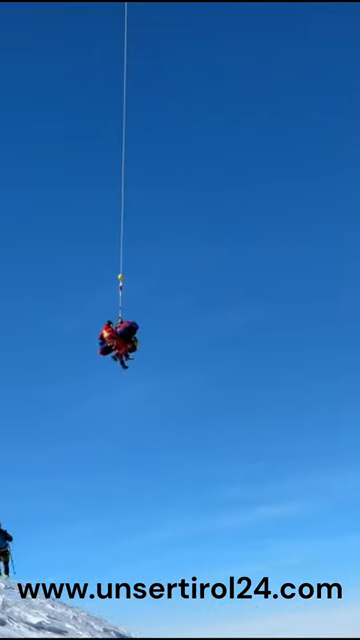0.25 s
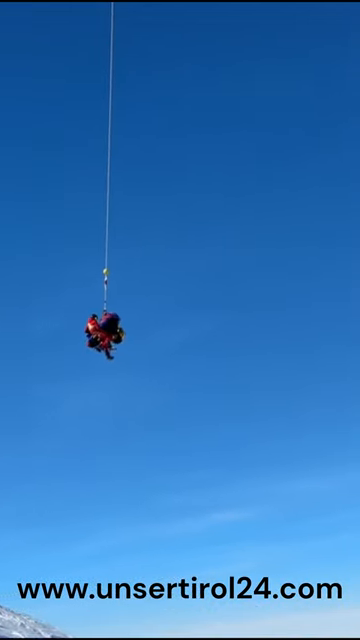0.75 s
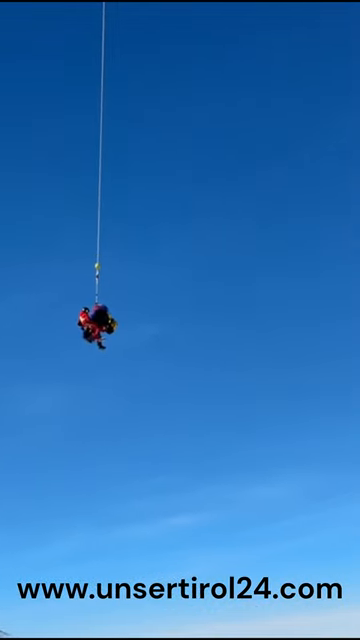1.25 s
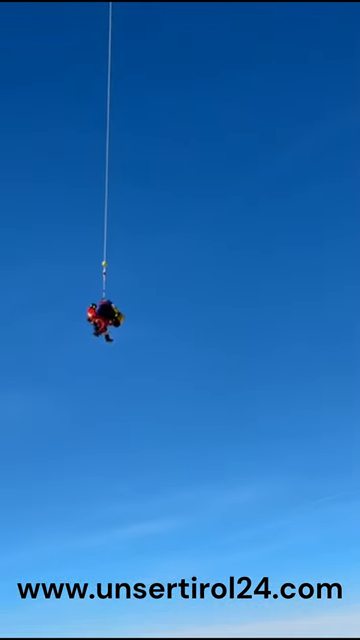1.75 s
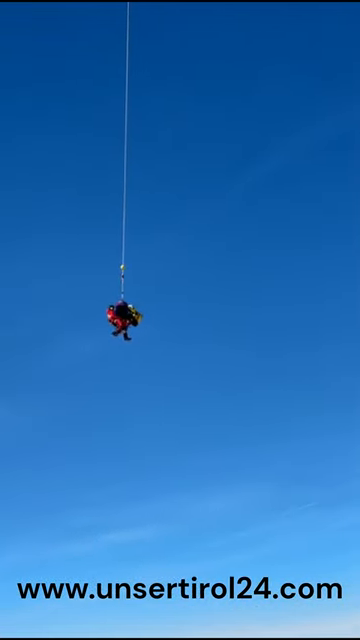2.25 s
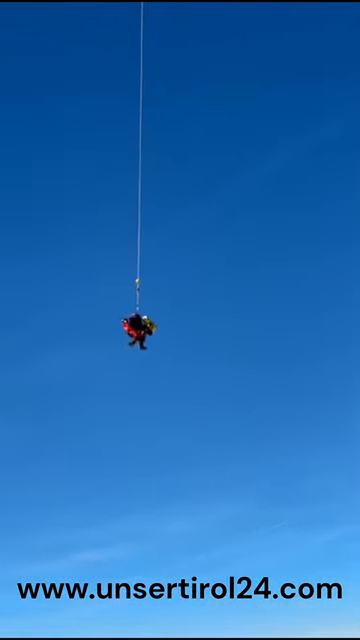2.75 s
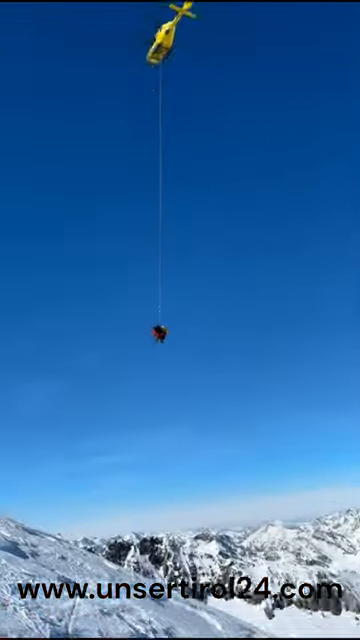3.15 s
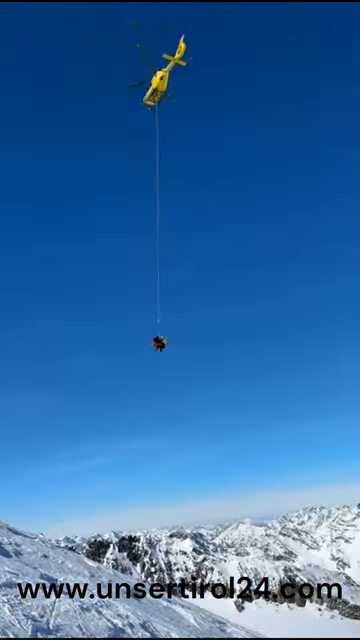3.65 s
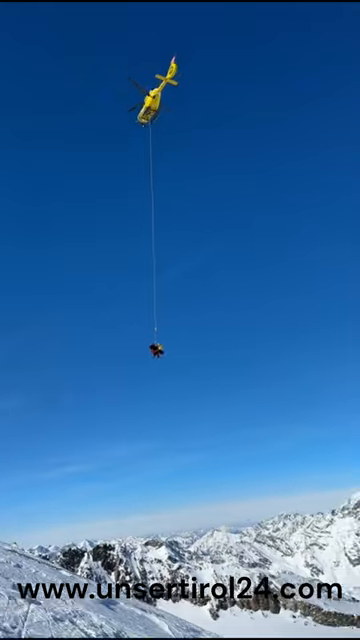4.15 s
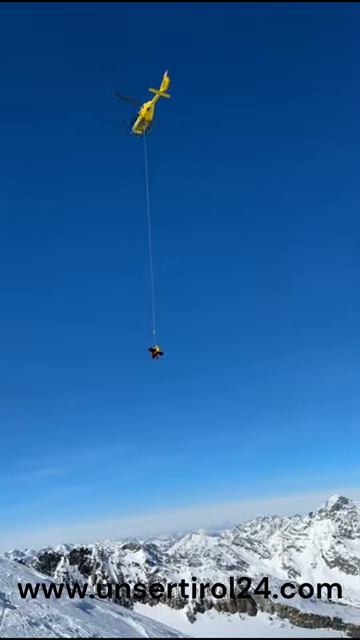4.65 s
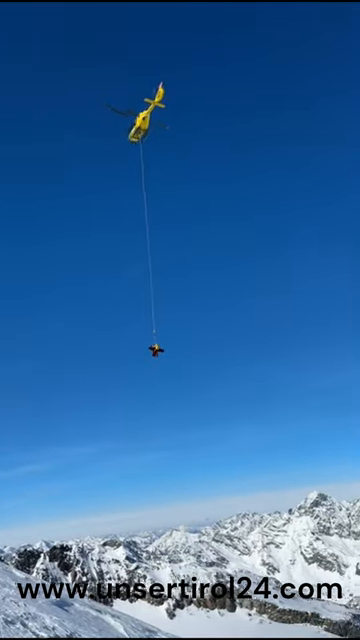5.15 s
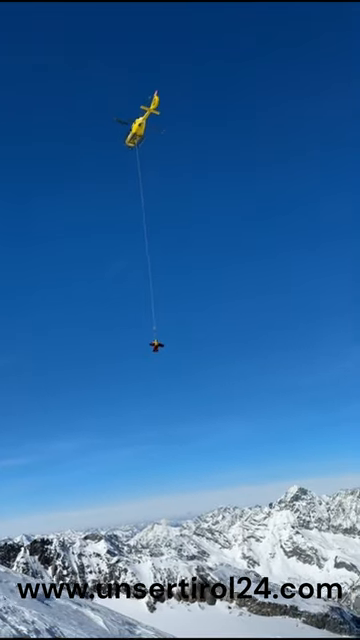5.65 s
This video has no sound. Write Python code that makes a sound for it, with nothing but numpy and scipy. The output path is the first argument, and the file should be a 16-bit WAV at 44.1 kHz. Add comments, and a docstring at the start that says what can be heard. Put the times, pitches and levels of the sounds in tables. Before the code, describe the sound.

A rescue helicopter hovers close with a singing tail rotor and throbbing blades, slaps hard as it turns, then fades into the distance over windy snow.

```python
"""First a ducted tail rotor singing near 497 Hz, under turbine hiss, with gusts bumping the microphone.
High over a snowy summit a rescue helicopter hovers, then turns and draws away into the distance.
The tail rotor is a stack of shaken tones; the main blades throb, swish and for a moment slap through
their own wake, made of harmonics, noise pulsed at the blade rate and short filtered cracks.
Wind is coloured noise swelling in gusts; a thin whine and a deep hum edge the scene."""
import sys
import numpy as np
from scipy import signal
from scipy.fft import rfft, irfft
from scipy.io import wavfile

SR = 44100
rng = np.random.default_rng(int(sys.argv[2]) if len(sys.argv) > 2 else 0)


def wav_out(sig):
    """Save sig, one row per channel (or a flat mono array), as 16-bit PCM at SR to the path in sys.argv[1]."""
    wavfile.write(sys.argv[1], SR, np.round(np.clip(np.atleast_2d(sig).T, -1, 1) * 32767).astype(np.int16))


N = 260181
TIME = np.arange(N) / SR  # s
BINS = np.fft.rfftfreq(N, 1 / SR)  # Hz

# Table levels are starting points: the functions add their trims. Colours give only the spectral shape.
# single buffets at the microphone: [t/s, level/dB, length/s, upper edge f/Hz (at least 100 is used)]
BUFFETS = [(.085, -18, 0.063, 446), (0.171, -27, 0.12, 358), (.243, -28, .06, 308), (2.74, -36, 0.056, 251),
           (2.809, -23.5, 0.046, 116), (2.903, -32, 0.078, 377), (2.96, -24.5, 0.036, 113),
           (3.044, -35, .04, 447), (3.128, -29.5, .09, 260), (3.2, -34.5, .05, 350),
           (3.264, -28.5, .06, 420), (3.421, -36, 0.23, 470), (3.673, -38, 0.11, 250),
           (3.78, -45, .06, 203), (5.57, -32, 0.068, 200)]
# gusts over the breeze: [t/s, level/dB, length/s, share that differs between left and right/0-1]
GUSTS = [(0.016, -32, 0.31, .05), (1.66, -25, 0.099, 0), (2.37, -37.5, 1, .05), (2.814, -28, .46, 0),
         (3.137, -36.5, 0.4, 0.07), (3.365, -39, 0.39, 0.18), (4.467, -39, 0.26, 0.6),
         (4.69, -49, 0.46, 0.8), (4.96, -40, 0.2, 1), (5.15, -42.5, 0.3, 0.13), (5.68, -52, .44, .35)]
BREEZE_DB = -50
# colour of the wind common to both channels: [f/Hz, level/dB per Hz]
WIND_COLOUR = [(15, -38), (30, -16), (52, -4), (75, 3.5), (115, 1.5), (200, -6.5), (400, -16), (1000, -45)]
# colour of the wind opposed between the channels: [f/Hz, level/dB per Hz]
CROSSWIND_COLOUR = [(50, -12.5), (110, -3), (180, 2), (280, -6), (500, -22)]

# the thin whine at the very top: [t/s, level/dB, centre f/Hz]
WHINE = [(0, -39.5, 9260), (1.5, -38.5, 9420), (2.4, -40, 9250), (2.85, -42.5, 9270), (3.3, -42, 9300),
         (3.9, -39, 9280), (5, -38.5, 9230), (5.9, -36.5, 9150)]
# its skirt: [distance from the centre f/Hz, level/dB]
WHINE_SKIRT = [(0, 9.5), (80, 1.5), (200, -1.5), (400, -23.5), (900, -38.5), (1500, -33.5)]
# the deep hum of the main rotor, which carries farthest: [t/s, level/dB]
HUM = [(0, -49), (3.8, -53), (4.8, -49.5), (5.3, -51), (5.9, -47)]

# the blades' rush and the turbines' hiss: [t/s, rush level/dB, hiss level/dB]
AIR = [(0, -32.5, -29), (.38, -37.5, -31.5), (.62, -29.5, -31.5), (.82, -36, -34.5), (1.12, -33, -33.5),
       (1.25, -27.5, -26.5), (1.89, -25, -28.5), (2.12, -31, -36.5), (2.32, -28, -34), (2.5, -31, -33),
       (2.95, -45.5, -38.5), (3.4, -48.5, -43.5), (3.58, -43, -40.5), (3.85, -45, -40), (4.18, -42.5, -37),
       (4.42, -33, -37), (4.56, -34, -38.5), (4.76, -45.5, -39.5), (5.1, -45, -40.5), (5.56, -37.5, -38.5),
       (5.9, -43, -40)]
# colour of the rush: [f/Hz, level/dB per Hz]
RUSH_COLOUR = [(200, -21), (400, -4), (560, 1.5), (800, 3.5), (1000, 0.5), (1250, -5.5), (1800, -30.5)]
# colour of the swish: [f/Hz, level/dB per Hz]
SWISH_COLOUR = [(800, -31), (1200, -1), (1550, 4.5), (1780, -2), (2050, 2), (2650, 1), (3100, -6),
                (3700, -5.5), (4500, -15), (5500, -23)]
# exhaust hiss at close distance: [f/Hz, level/dB per Hz]
HISS_NEAR = [(2000, -20), (3100, -7.5), (3600, -0.5), (4500, 3.5), (5500, 4), (6700, -0.5), (8000, 4),
             (9000, 3.5), (9550, 7.5), (9800, -4.5), (10500, -10.5)]
# exhaust hiss from farther off: [f/Hz, level/dB per Hz]
HISS_FAR = [(2000, -30.5), (3100, -8), (3800, 3.5), (4300, 0.5), (4800, -0.5), (5500, 3.5), (6700, 0.5),
            (8000, 1.5), (9000, 6.5), (9700, -13), (10500, -0.5)]
# moments when the blades swish toward the listener: [t/s, level/dB, length/s]
SWISHES = [(.66, -36.5, 0.45), (2.5, -37, 1), (2.88, -37.5, 0.39), (3.7, -53, 0.37), (4.46, -40, 0.67),
           (5.52, -45, 0.36)]
# the steady swish follows rush and hiss: its dB when both stand at USUAL_DB, and dB for each dB of either
USUAL_DB = -35
SWISH_DB, SWISH_PER_RUSH, SWISH_PER_HISS = -38, 0.24, 1
# a narrow, bright flutter as the blades tilt away: [t/s, level/dB, length/s]
FLUTTERS = [(2.54, -38, .2), (2.93, -41.5, 0.34)]
# colour of the flutter: [f/Hz, level/dB per Hz]
FLUTTER_COLOUR = [(2100, -26), (2450, 1), (2620, 1), (2780, -3), (3100, -26)]

BLADE_HZ = 27.15  # blade passes per second, before the lead below shifts them
# how early a blade is loudest toward the listener: [t/s, lead/share of one blade pass]
BLADE_LEAD = [(0, .05), (1.15, .15), (1.48, .15), (1.55, -.3), (1.72, -.17), (2.3, -.15), (3, -.02),
              (3.7, .12), (5.9, .14)]
# how deep the blades run in their own wake: [t/s, depth/0-1]
WAKE = [(1.45, 0.15), (1.57, 0.4), (1.8, 0.4), (2, 0.6), (2.13, 0.3), (2.4, 0.6), (2.7, 0.8), (2.9, 0.7),
        (3.05, 0.1), (4.25, 0.01), (4.48, 0.1), (4.7, 0.01)]
# level of the main rotor throb: [t/s, level/dB]
THROB = [(0, -33), (.42, -39.5), (.68, -36), (.8, -30.5), (1.25, -29.5), (1.47, -28.5), (1.66, -31.5),
         (1.8, -35.5), (2.1, -37.5), (2.6, -48), (3.3, -46.5), (3.95, -51.5), (4.4, -46.5), (5.2, -46.5),
         (5.6, -42), (5.9, -41)]
# colour of the deep thud: [f/Hz, level/dB per Hz]
THUD_COLOUR = [(60, -22), (100, -10.5), (135, .5), (160, -1), (195, 0.5), (238, -8), (330, -20)]
# colour of the knock above it: [f/Hz, level/dB per Hz]
KNOCK_COLOUR = [(190, -34), (255, -13), (305, 1.5), (355, 3), (410, -5), (560, -4.5), (900, -39.5)]
# the beat of the throb, and where in its cycle a thud falls (share of one cycle)
THROB_HZ, THROB_LAG = 26.7, .25
# above this level of hiss the throb hardens: dB more knock for each dB of hiss
HARD_FROM_DB, KNOCK_GROWTH = -32.5, 0.65
# the hardest blade slaps: [t/s, peak level/dB, time over which the crack splinters/s, pitch f/Hz]
SLAPS = [(1.207, -14.5, 0.0045, 520), (1.242, -19, 0.0033, 650), (1.318, -13, 0.0031, 656),
         (1.559, -15, 0.0036, 1100), (1.591, -16, 0.0038, 1100), (1.628, -21, 0.0024, 1100),
         (1.665, -16, .004, 1100), (1.699, -11, 0.0027, 990), (1.736, -14, 0.0057, 1300),
         (1.773, -8, 0.0036, 1100), (1.809, -7.5, .0018, 1000), (1.846, -6.5, .0035, 890),
         (1.881, -5.5, .005, 1340), (1.920, -9, 0.0046, 1020), (1.955, -11, .005, 950),
         (1.991, -13, 0.0018, 1110), (2.029, -19, 0.0031, 1000), (2.063, -20, 0.0028, 950),
         (2.248, -19, 0.0032, 1010), (2.287, -19, 0.0053, 1000), (2.324, -18, 0.0046, 1010),
         (2.362, -19, 0.0046, 950), (2.396, -9.5, 0.0035, 890), (2.466, -12.5, 0.0043, 1120),
         (2.541, -20, 0.0046, 1000), (2.616, -15, 0.0033, 1390)]

# leading tail rotor tone, sinking as the helicopter leaves: [t/s, f/Hz]
TAIL_PITCH = [(0, 497), (.5, 495.5), (1.7, 496.4), (2, 497.8), (2.45, 495.8), (3.3, 494.6), (4.1, 492.6),
              (4.7, 492.3), (5.1, 490.8), (5.9, 492.2)]
# its level as the beam of the duct sweeps over the listener: [t/s, level/dB]
TAIL_TONE = [(0, -30), (.1, -28.5), (.18, -36), (.27, -30.5), (.45, -31), (.69, -24), (1.02, -23),
             (1.16, -25.5), (1.3, -21.5), (1.48, -19.5), (1.63, -19), (1.94, -33), (2.04, -27),
             (2.44, -29.5), (2.77, -46.5), (2.97, -51), (3.27, -48), (3.45, -40), (3.58, -44.5),
             (3.72, -42.5), (3.85, -48), (4.05, -57), (4.21, -33.5), (4.42, -28.5), (4.79, -35.5),
             (4.86, -45), (4.93, -43), (5, -51), (5.1, -44.5), (5.27, -37), (5.55, -34.5), (5.72, -37),
             (5.9, -38.5)]
# other tail tones, against the mean of leading tone and rush:
# [multiple of a quarter of the leading f, hovering level/dB, turning level/dB, leaving level/dB]
TAIL_LINES = [(3, -24, -5.5, -18), (5, 1, -7, -7.5), (6, -6, -5.5, -10.5), (7, -8, -7, -8),
              (8, -15.5, -15, -20), (9, -9.5, -14.5, -15.5), (10, -14.5, -24.5, -21), (12, -32, -14.5, -27),
              (16, -20, -21.5, -18)]
TURN_START_S, TURN_END_S = 0.62, 1.35
LEAVE_START_S, LEAVE_END_S = 2.05, 2.44

# likeness of the two microphone channels: [f/Hz, correlation/-1 to 1]
SAME = [(60, 1), (500, .985), (1200, .98), (2200, 1), (4200, 1), (4600, .98), (4950, .47), (5300, 1),
        (6800, 1), (7400, .98), (7900, .49), (9300, -.12), (9900, -1)]
# lean to the left: [f/Hz, left minus right level/dB, before LEAN scales it]
BALANCE = [(100, .4), (300, 1), (500, 1.7), (640, 1.1), (750, 2.3), (920, 1.2), (1130, -1.9), (1600, -1),
           (2100, 0)]
# extra left-right level difference near 3 kHz, mostly in the later part:
# [f/Hz, left minus right level/dB, scaled from LEAN]
LATE_BALANCE = [(2100, 0), (2700, .7), (3020, 2.6), (3400, .3), (3800, 0)]
# the lean grows as the helicopter moves off: [t/s, factor]
LEAN = [(0, 1.13), (2.9, 0.91), (3.7, 1.85), (5.9, 1.6)]
EDGE_HZ = 10450  # upper limit of the band


def amp(db):
    """Decibels to gain."""
    return 10 ** (np.asarray(db) / 20)


def unit(x):
    """Scales to rms 1."""
    return x / np.sqrt(np.mean(x ** 2) + 1e-20)


def curves(rows):
    """Each column of a time table, sample by sample."""
    s, *columns = np.transpose(rows)
    return [np.interp(TIME, s, c) for c in columns]


def at_hz(points, hz):
    """Reads a table on a log-frequency axis."""
    f, value = np.transpose(points)
    return np.interp(np.log(hz + 1), np.log(f + 1), value)


def drift(hz):
    """Slow chance of rms 1, up to about hz."""
    size = 8192
    rates = np.fft.rfftfreq(size, TIME[-1] / size)
    slow = irfft(rfft(rng.standard_normal(size)) / (1 + (rates / hz) ** 4))
    return unit(np.interp(TIME, np.linspace(0, TIME[-1], size), slow))


def swells(rows, steady_db):
    """Gain of a steady level with smooth rises and falls added in power: rows of (t/s, level/dB, length/s)."""
    power = amp(steady_db) ** 2
    for s, db, length in rows:
        bump = amp(db) * np.cos(np.pi * np.clip((TIME - s) / length, -.5, .5)) ** 2
        power = power + bump ** 2
    return np.sqrt(power)


def add(mix, s, sound):
    """Mixes a sound in at time s."""
    part = mix[max(round(s * SR), 0):][:len(sound)]
    part += sound[:len(part)]


def noise(colour):
    """Two channels of coloured noise, alike in the bass and opposed at the top, as SAME sets."""
    a, b = rfft(rng.standard_normal((2, N)))
    same = np.clip(at_hz(SAME, BINS), -1, 1)
    mid, side = a * np.sqrt(1 + same), b * np.sqrt(1 - same)
    skirts = np.minimum(BINS / colour[0][0], 1) ** 2 / np.maximum(BINS / colour[-1][0], 1) ** 2
    channels = np.array([mid + side, mid - side])
    return unit(irfft(channels * amp(at_hz(colour, BINS)) * skirts, N))


def blade_turns():
    """Count of blade passes so far, shifted by how early each blade is loudest."""
    return BLADE_HZ * TIME + curves(BLADE_LEAD)[0]


def blade_pass(depth, sharpness, uneven_db=1.0, early=0):
    """A swell of mean power 1 as each blade sweeps by; its strength drifts from pass to pass."""
    swell = np.exp(sharpness * (np.cos(2 * np.pi * (blade_turns() + early)) - 1))
    return unit(1 + depth * swell * amp(uneven_db * drift(hz=9.2)))


def wind(level_db=-1, lumpy_db=0.6, buffet_db=0):
    """A lumpy rumble of gusts, with single eddies breaking on the microphone."""
    eddies = np.zeros(N)
    for s, db, length, edge_hz in BUFFETS:
        band = signal.butter(2, [54, max(edge_hz, 100)], "band", fs=SR, output="sos")
        puff = signal.sosfilt(band, rng.standard_normal(SR))[-int(length * SR):]
        window = np.hanning(len(puff))
        shaped = unit(puff * window) * np.sqrt(np.mean(window ** 2))
        add(eddies, s - length / 2, amp(db + buffet_db) * shaped)
    shared_rows, opposed_rows = [], []
    for s, db, length, apart in GUSTS:
        apart = np.clip(apart, .01, .99)
        shared_rows.append((s, db + 10 * np.log10(1 - apart ** 2), length))
        opposed_rows.append((s, db + 20 * np.log10(apart), length))
    shared = swells(shared_rows, BREEZE_DB) * noise(WIND_COLOUR)
    opposed = swells(opposed_rows, -np.inf) * noise(CROSSWIND_COLOUR)[0]
    rumble = shared + np.array([[1], [-1]]) * opposed
    return eddies + amp(level_db + lumpy_db * drift(hz=10)) * rumble


def whine():
    """A narrow, fuzzy band: noise shaped around zero frequency, then shifted up to a wandering centre."""
    level_db, hz = curves(WHINE)
    offset, db = np.transpose(WHINE_SKIRT)
    skirt = amp(np.interp(abs(np.fft.fftfreq(N, 1 / SR)), offset, db, right=-np.inf))
    fuzz = np.fft.ifft(skirt * (rng.standard_normal((2, N)) + 1j * rng.standard_normal((2, N))))
    carrier = np.exp(2j * np.pi * np.cumsum(hz) / SR)
    return amp(level_db + 1.44 * drift(hz=25)) * unit((fuzz * carrier).real)


def rotor_hum():
    """The second harmonic of the blade passes, swelling and fading a little."""
    flutter_db = 2.5 * drift(hz=4)
    tone = np.sin(2 * 2 * np.pi * blade_turns())
    return np.sqrt(2) * amp(curves(HUM)[0] + flutter_db) * tone


def air(rush_db=0, hiss_db=-1.0, wake_db=-0.3):
    """Broad noise of blade tips and exhaust, pulsed at the blade rate; the wake deepens the swish pulses."""
    rush, hiss = curves(AIR)
    steady_db = SWISH_DB + SWISH_PER_RUSH * (rush - USUAL_DB) + SWISH_PER_HISS * (hiss - USUAL_DB)
    swish = swells(SWISHES, steady_db)
    # the chopping deepens as the helicopter turns
    chop = np.interp(TIME, [1.4, 2.8, 4.2], [.45, 1, .8])
    # with distance the exhaust hiss takes on a more hollow colour
    far = np.interp(TIME, [2.7, 3.6], [0, 1])
    flutter_db, grain_db = .9 * drift(hz=8), 1.4 * drift(hz=300)
    wake = curves(WAKE)[0]

    low = amp(rush + rush_db + flutter_db + wake_db * wake) * noise(RUSH_COLOUR)
    low = low * blade_pass(depth=0.62, sharpness=2.1)
    middle = swish * amp(grain_db + drift(hz=11.0) + wake_db * wake) * noise(SWISH_COLOUR)
    middle = middle * blade_pass(depth=0.5 * chop + 0.27 * wake, sharpness=2.4)
    exhaust = np.sqrt(1 - far) * noise(HISS_NEAR) + np.sqrt(far) * noise(HISS_FAR)
    high = amp(hiss + hiss_db + 0.5 * drift(hz=12)) * exhaust
    high = high * blade_pass(depth=0.52 * chop, sharpness=0.91, early=-0.062)
    return low + middle + high


def flutter(level_db=0):
    """A narrow band of tip noise, pulsing with the blades."""
    pulses = noise(FLUTTER_COLOUR) * blade_pass(depth=2.0, sharpness=2)
    return swells(FLUTTERS, -np.inf) * amp(level_db) * pulses


def tail_rotor(tone_db=0.53, upper_db=-2, flutter_db=.5, waver=0.028, chop_db=-12.0, second_chop_db=-21,
               scatter_db=-50):
    """Unevenly spaced fan blades give a stack on about 124 Hz, led by line four; moving air shakes each line."""
    turns = np.cumsum(curves(TAIL_PITCH)[0]) / SR / 4
    tone, rush = curves(TAIL_TONE)[0], curves(AIR)[0]
    upper = (tone + rush) / 2 + upper_db
    upper_flutter_db, smear = 2, .5  # smear in radians
    # each line: multiple, level in dB, phase wander in radians
    lines = [(4, tone + tone_db + flutter_db * drift(hz=15), 0)]
    # a faint scattered copy of the leading tone blurs it when the beam points away
    lines.append((4, scatter_db + 3 * drift(hz=12), 2 * drift(hz=7)))
    stages = [TURN_START_S, TURN_END_S, LEAVE_START_S, LEAVE_END_S]
    for k, hovering_db, turning_db, leaving_db in TAIL_LINES:
        beam = np.interp(TIME, stages, [hovering_db, turning_db, turning_db, leaving_db])
        level = upper + beam + upper_flutter_db * drift(hz=5.1)
        lines.append((round(k), level, smear * drift(hz=14.0)))
    shake = waver * drift(hz=5.5) / 2
    stack = 0
    for k, db, wander in lines:
        phase = k * (2 * np.pi * turns + shake) + wander + 2 * np.pi * rng.random()
        stack = stack + amp(db) * np.exp(1j * phase)
    # the main blades chop each line, most in the wake, adding side tones just above it
    blade = np.sqrt(np.clip(curves(WAKE)[0], .2, 1)) * np.exp(2j * np.pi * blade_turns())
    chopped = stack * (1 + amp(chop_db) * blade + amp(second_chop_db) * blade ** 2)
    return np.sqrt(2) * chopped.real


def thuds(colour):
    """Each blade gives nearly the same thud: a stack of harmonics, with a puff of turbulence on every beat."""
    smear, wander = .7, .5  # phase scatter and drift in radians
    # the thuds lose their regularity as the helicopter leaves
    steady = np.interp(TIME, [1.7, 2.4], [.62, .12])
    angle = 2 * np.pi * (THROB_HZ * TIME - THROB_LAG)
    stack = np.zeros(N)
    for k in range(4, 18):
        phase = k * angle + smear * rng.standard_normal() + wander * drift(hz=3)
        stack += amp(at_hz(colour, k * THROB_HZ)) * np.cos(phase)
    beats = 1 + 1.2 * np.exp(2 * (np.cos(angle) - 1))
    puffs = unit(beats * noise(colour))
    return np.sqrt(steady) * unit(stack) + np.sqrt(1 - steady) * puffs


def throb(thud_db=0, knock_db=0):
    """The main rotor's beat: a deep thud, and a knock above it that hardens when the hiss is loud."""
    thud = curves(THROB)[0]
    knock = thud + KNOCK_GROWTH * np.maximum(curves(AIR)[1] - HARD_FROM_DB, 0)
    return amp(thud + thud_db) * thuds(THUD_COLOUR) + amp(knock + knock_db) * thuds(KNOCK_COLOUR)


def crack(spread_s, hz):
    """A blade strikes the tip vortices of those before it: a crack and three weaker ones, scaled to peak 1."""
    t = np.arange(1024) / SR
    late, strong = rng.random((2, 3))
    delays = np.append(0, spread_s * (np.arange(3) + .5 + late / 2) / 3)
    sizes = np.append(1, .3 + .3 * strong)
    hits = sum(size * np.exp(-((t - .0005 - d) / .00007) ** 2) for d, size in zip(delays, sizes))
    band = signal.butter(2, [.58 * hz, 1.8 * hz], "band", fs=SR, output="sos")
    sound = signal.sosfilt(band, hits)
    return -sound / abs(sound).max()


def slaps(level_db=-1, patter_db=-23, patter_hz=1250):
    """Blades meeting their wake crack: hard slaps at listed times, else a light pat scaled by wake depth."""
    passes = np.diff(np.floor(blade_turns()), prepend=0) > 0
    # pats keep half a blade pass clear of every hard slap
    free = np.all([abs(TIME - row[0]) > .5 / BLADE_HZ for row in SLAPS], axis=0)
    strength = amp(patter_db + 1.1 * drift(hz=14)) * curves(WAKE)[0]
    out = signal.oaconvolve(passes * free * strength, crack(0.0043, patter_hz))[:N]
    for s, db, spread_s, hz in SLAPS:
        add(out, s, amp(db + level_db) * crack(spread_s, hz))
    return out


def placed(x):
    """Sets the helicopter in the stereo field: bands lean left or right, more so once it has moved off."""
    factor = curves(LEAN)[0]
    spectrum = rfft(x)
    lean = factor * irfft(spectrum * (amp(at_hz(BALANCE, BINS) / 2) - 1), N)
    late_lean = irfft(spectrum * (amp(at_hz(LATE_BALANCE, BINS) / 2) - 1), N)
    lean = lean + np.clip(factor - 1, 0, 1) * late_lean
    return x + np.array([[1], [-1]]) * lean


def scene():
    """The helicopter in open air, with wind at the microphone."""
    helicopter = rotor_hum() + air() + flutter() + tail_rotor() + throb() + slaps()
    return wind() + whine() + placed(helicopter)


def record(dry):
    """The microphone has a narrow dip near 5 kHz; then the band limit."""
    dip = amp(-10 * np.exp(-((BINS - 4940) / 80) ** 2))
    coloured = irfft(rfft(dry) * dip, N)
    lowpass = signal.firwin(1023, EDGE_HZ, window=("kaiser", 9), fs=SR)
    return signal.oaconvolve(coloured, lowpass[None], "same")


dry = scene()
out = record(dry)
wav_out(out)
```